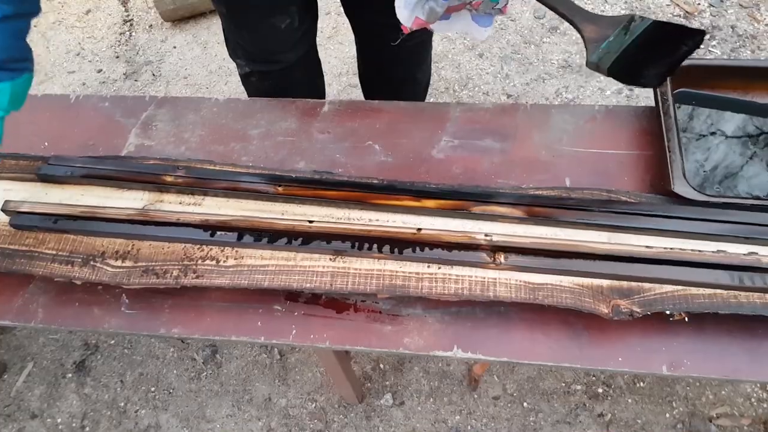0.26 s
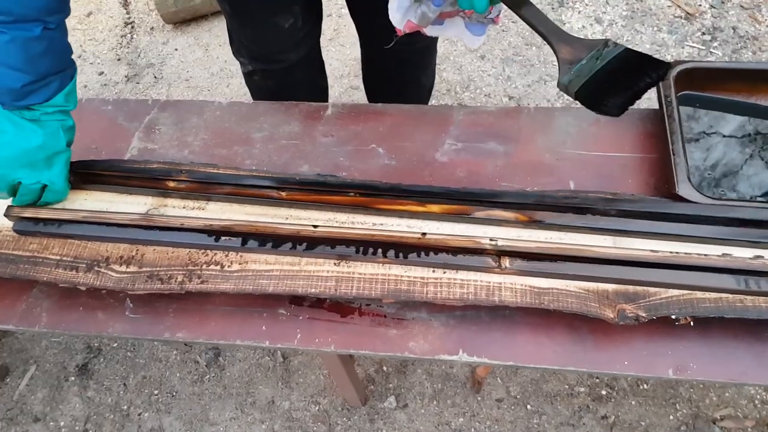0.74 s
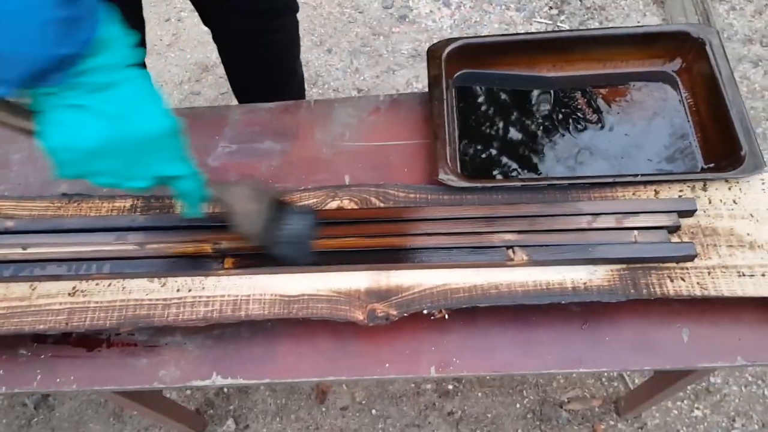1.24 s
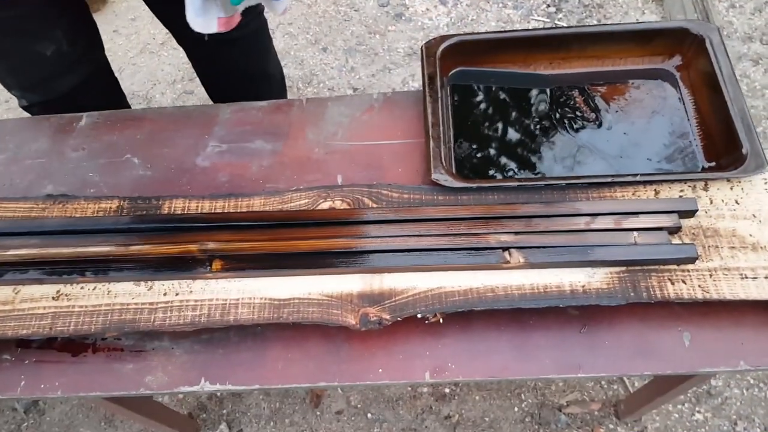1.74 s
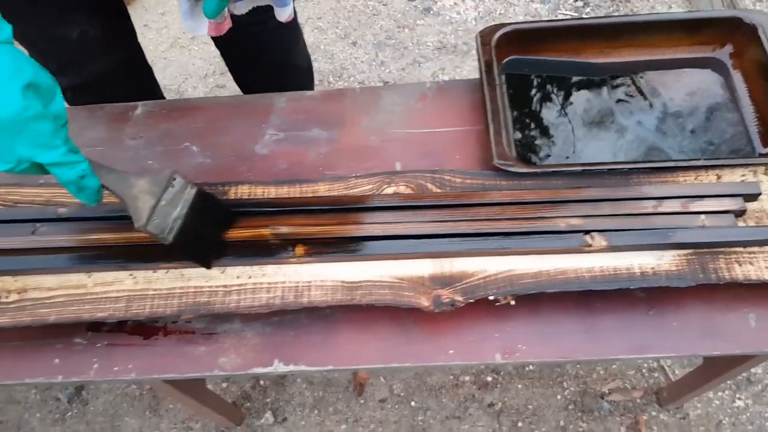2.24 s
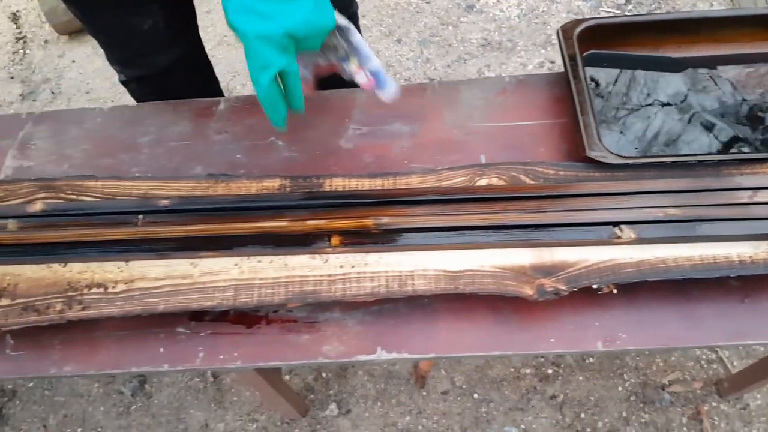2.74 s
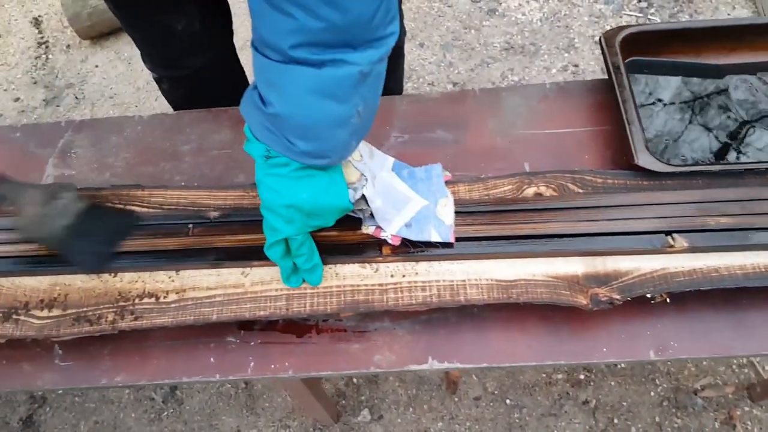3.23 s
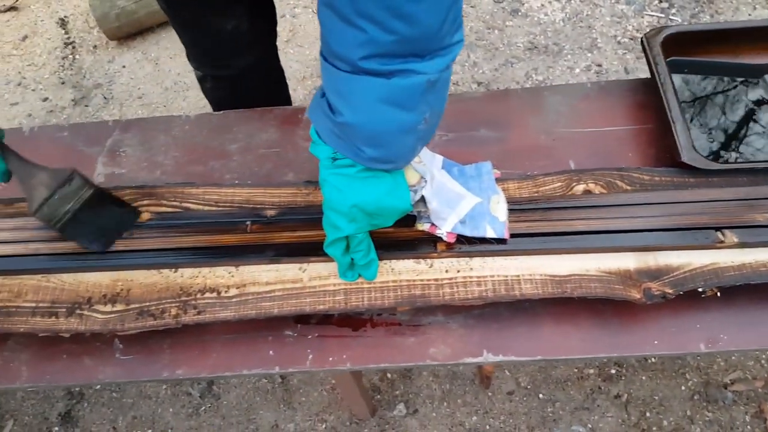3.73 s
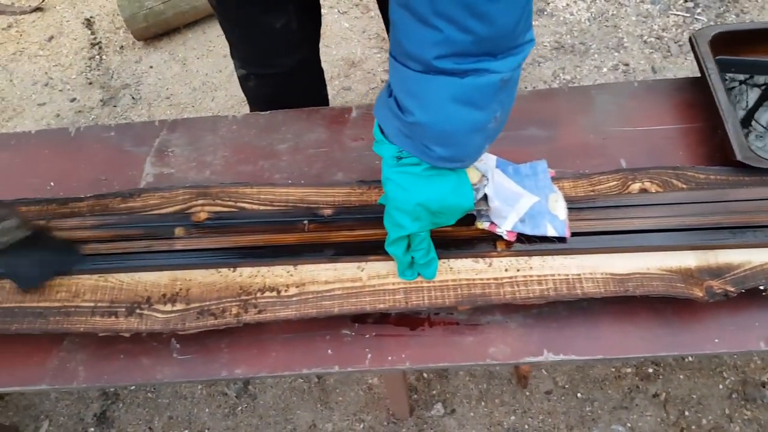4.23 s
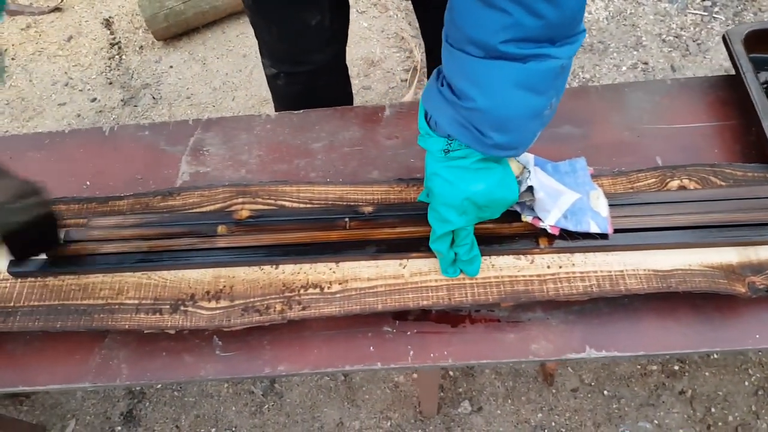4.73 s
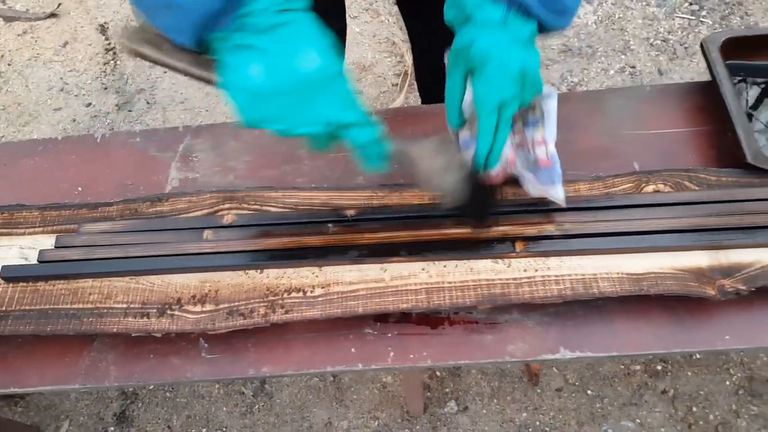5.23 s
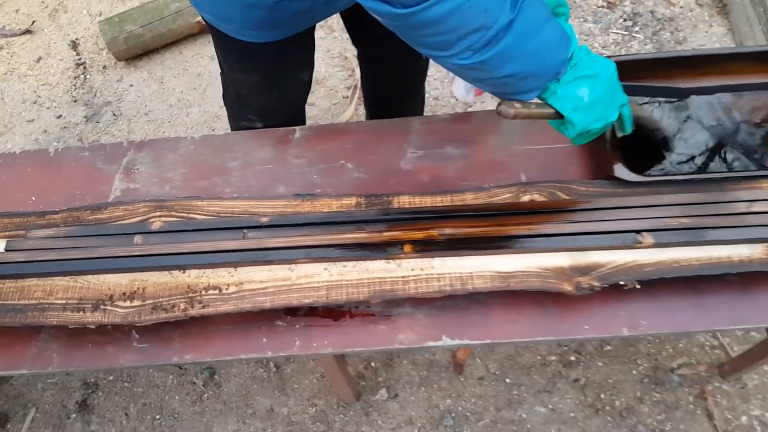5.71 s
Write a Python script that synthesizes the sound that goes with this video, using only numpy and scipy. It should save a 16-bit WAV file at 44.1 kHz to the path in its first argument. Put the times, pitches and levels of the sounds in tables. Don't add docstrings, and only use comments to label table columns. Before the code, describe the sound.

A wet brush rasps and sizzles over wooden slats outdoors in irregular strokes, with one sharp ringing knock and wind buffeting the microphone.

```python
import sys
import numpy as np
from scipy import signal
from scipy.fft import rfft, irfft, next_fast_len
from scipy.io import wavfile
from scipy.ndimage import uniform_filter1d

SR = 44100
rng = np.random.default_rng(int(sys.argv[2]) if len(sys.argv) > 2 else 0)


def volts_from_db(level):
    exponent = np.asarray(level, float) / 20
    return 10 ** exponent


def materialize(psi):
    bounded = np.clip(np.atleast_2d(psi).T, -1, 1)
    quanta = np.round(bounded * 32767).astype(np.int16)
    wavfile.write(sys.argv[1], SR, quanta)


N = 263096
SIZE = next_fast_len(N)
HZ = np.maximum(np.fft.rfftfreq(SIZE, 1 / SR), 1)
STEP = 44
TICKS = np.arange(0, N + STEP, STEP) / SR

# [f/Hz, level per Hz/dB]
AIR_COLOUR = [(180, -21), (300, -3), (432, -4), (461, -2), (501, -11), (621, -9), (674, -23), (783, -26),
              (908, -5), (1470, -32), (6600, -37), (8460, -59), (15600, -9.5)]
AIR_DB = -71.5
HUM_HZ, HUM_WIDTH_HZ, HUM_DB = 71.5, 16, -66.5

WASH_REST_DB, WASH_RE_STROKE_DB, WASH_RE_RUSTLE_DB, WASH_RE_WIND_DB = -76.5, -15.5, 1, -25
WASH_LAG_S = 0.1
WASH_TOP_DB = -66

# [t/s, level/dB]
STEADY_WIND = [(0.0, -54), (0.6, -54.5), (1.17, -47.5), (1.23, -69), (1.85, -77), (2.06, -64), (2.2, -72),
               (2.54, -56), (3.08, -54), (3.6, -52), (4.09, -55), (4.5, -53), (4.72, -49), (5.2, -44.5),
               (5.46, -52), (5.65, -49.5), (5.84, -57.5), (5.97, -51)]
# [peak t/s, swell level/dB, time to lose 10 dB/s, flutter level/dB]
GUSTS = [(0.12, -41, 0.08, -53), (0.29, -38, 0.06, -64), (0.38, -37, 0.03, -60), (0.46, -46, 0.02, -64),
         (0.56, -48.5, 0.02, -71), (0.7, -36, 0.03, -62), (0.9, -40, .11, -55), (1.16, -44.5, 0.06, -69),
         (2.69, -47, .1, -70), (2.76, -35, .012, -59), (2.92, -40, .09, -66), (3.3, -45.5, .14, -63),
         (3.67, -44, 0.08, -63), (3.77, -38, .03, -60), (3.85, -38, .05, -64), (3.99, -40, 0.07, -61),
         (4.22, -36.5, .07, -57), (4.33, -32, 0.0448, -50), (4.63, -47, .06, -65), (4.8, -42.5, 0.02, -59),
         (4.97, -36, .045, -54.5), (5.1, -36.5, .06, -52.5), (5.24, -37.5, .05, -63),
         (5.33, -32.5, 0.0355, -63), (5.43, -39.5, 0.02, -58.5), (5.55, -42, 0.05, -60),
         (5.88, -46, .05, -65)]
GUST_TOP_DB = -31.5
FLUTTER_DB, FLUTTER_FOLLOWS, FLUTTER_LOSS = -66.5, 0.48, 0.75
# [t/s, peak level/dB, push length/s]
BUFFETS = [
    (0.683, -38, 0.006),
    (2.74, -31.5, 0.0077),
    (2.913, -46.5, 0.0096),
    (3.957, -40, 0.0064),
    (4.312, -19, 0.0049),
    (5.037, -32, 0.0058),
    (5.155, -27.5, 0.0087),
    (5.198, -30, 0.0075),
]
MIC_LOW_HZ, PORT_HZ = 27.8, 55.7

BENCH_MODES_HZ = [190, 292, 366, 541, 614, 785, 895, 1035, 1077, 1253, 1303, 1453, 1518, 1772, 1927, 2175,
                  2280, 2522, 2640, 2859]
# [level/dB, time to lose 60 dB/s]
BENCH_RINGING = [(-15, 0.35), (-10.5, 0.18), (-11, 0.28), (-15, 0.23), (-9.5, 0.24), (-7, 0.16), (2, 0.22),
                 (-2.5, 0.2), (-10, 0.24), (-6, 0.37), (-8, 0.66), (-10, .2), (-4, 0.21), (-12, 0.15),
                 (-23, 0.22), (-34, 0.29), (-49, .2), (-21, 0.29), (-52, 0.2), (-43, 0.24)]
BENCH_HIT_S, BENCH_HIT_DB = 0.7995, -29

# [t/s, length/s, level/dB, pitch f/Hz, width/octaves]
SLIDES = [(0.075, 0.057, -59.5, 740, 1.9), (0.655, 0.26, -63.5, 4800, 0.25),
          (0.933, 0.042, -55.5, 1750, 0.36), (2.572, 0.16, -56.5, 222, 0.55), (2.578, .12, -58, 800, 0.46),
          (3.104, 0.03, -60, 1060, 1.24), (1.329, 0.007, -51.5, 6500, 1.6), (4.64, 0.22, -72, 1730, .25),
          (4.422, 0.015, -64.5, 2300, 2.4), (4.93, 0.059, -66, 4000, 0.39),
          (5.015, 0.085, -68.5, 4200, 0.5), (0.1, 0.096, -47.5, 178.6, 0.3), (0.79, 0.093, -50, 206, 0.7),
          (3.254, 0.013, -58.5, 1160, .5)]
# [t/s, peak level/dB, pitch f/Hz, length/s]
FLICKS = [(0.063, -42, 4220, 0.0055), (0.09, -36, 5150, 0.0037), (0.107, -44, 4270, 0.006),
          (0.123, -44, 4090, 0.006), (0.796, -42, 3600, 0.008), (0.9403, -52, 4440, 0.0049),
          (0.9644, -38.5, 4330, 0.0066), (1.6382, -29, 4800, 0.0085), (3.1058, -48, 4250, 0.024),
          (3.7199, -37, 4620, 0.011), (3.9564, -36, 2300, 0.0055), (4.1624, -54, 5260, 0.006),
          (4.167, -56, 6700, 0.006), (4.426, -48, 4700, 0.0052), (4.5306, -48, 7500, 0.012),
          (4.9911, -40, 4600, 0.006), (5.008, -37, 3950, 0.0058)]
# [t/s, peak level/dB, pitch f/Hz, time to lose 60 dB/s, dull body re peak/dB]
KNOCKS = [
    (0.092, -34, 803, 0.027, -18),
    (0.099, -29.5, 857, 0.023, -6),
    (0.799, -16.5, 704, 0.044, -20),
    (0.964, -38.5, 705, 0.025, -19),
    (5.01, -43.5, 806, 0.025, 0),
    (5.536, -43, 850, 0.024, -8),
]

# [t/s, length/s, hiss level/dB, rasp re hiss/dB, sizzle re hiss/dB]
RUSTLES = [(0.0, .03, -68, 6.5, -5), (0.068, 0.058, -64, 0.5, -4), (0.216, 0.48, -82.5, 1.5, 1.5),
           (0.4, 0.036, -77, -3, -1.5), (0.692, .1, -68, -14, -10), (0.792, .016, -57.5, 0, -17),
           (0.83, .065, -71, 0, -10), (0.941, 0.027, -62.5, 1, -4), (1.72, 0.12, -80, 13.5, -5),
           (2.26, 0.11, -76, 12.5, -1), (2.73, 0.35, -69.5, -3.5, -4), (3.112, 0.032, -65, -1, -5.5),
           (3.996, 0.037, -83, 4, 3), (4.15, .03, -81, -8, -4), (4.422, .03, -80, -5, -4),
           (4.97, 0.087, -70.5, 0, -2), (5.17, .37, -71.5, -0.5, -4), (5.06, .1, -75.5, -1, -1.5),
           (5.55, 0.063, -75, 2, -6), (5.63, .1, -81, 1.5, -1.5)]
RUSTLE_IN_DB_PER_S, RUSTLE_OUT_DB_PER_S = 500, 277
RUSTLE_RING_DB = -9.5

# [touch t/s, length/s, hiss at touch/dB, hiss at lift/dB, time to lose 20 dB after the lift/s]
GLIDING_STROKES = [
    (1.013, 0.64, -64.5, -54, .11),
    (1.885, 0.33, -56, -60.5, 0.13),
    (2.386, 0.32, -58, -57, 0.06),
    (3.191, 0.24, -60, -55, 0.0551),
    (4.8, 0.12, -68.5, -56.5, .07),
]
DROPPED_STROKES = [
    (3.715, 0.23, -65.5, -56, .045),
    (4.207, 0.118, -67.5, -56, 0.088),
    (4.535, 0.1, -70.5, -59, .07),
]
GLIDE_ON_DB_PER_S, DROP_ON_DB_PER_S = 320, 1500
EASE, ARCH_DB = 1.56, 2.5
# [t/s, gain/dB, width/s, further gain of the rasp/dB, further gain of the slat ring/dB]
PRESSES = [(1.3, -2.5, 0.16, 3.5, 0.5), (1.56, 1.5, 0.065, 0.8, -0.3), (2.0, 0.7, .07, -1.5, 0.8),
           (2.45, 0.5, .06, 1.5, 2.5), (2.61, 4, .05, 0.5, 3.0), (3.33, 1.5, 0.054, -1.5, 0.5),
           (4.27, 2.5, .03, -0.5, 1.5), (3.8, 1, 0.058, 2, -2.5), (3.93, -0.5, 0.05, 3.0, 0.5),
           (4.62, 0.5, .05, 1.5, -1.5), (4.86, 1.5, .04, -0.5, -2.5)]

# [f/Hz, level per Hz/dB]
BRISTLE_COLOUR = [(240, -70), (400, -22), (624, -15), (944, -8), (1360, -1.8), (1540, 0.4), (2370, 0.8),
                  (2930, -3.5), (3220, -3), (3930, -3.5), (6820, 6), (8710, -6), (11500, -1), (15600, -2)]
# [f/Hz, width/Hz, level/dB]
SLAT_RESONANCES = [(967, 71, 13), (1940, 480, 4), (2396, 310, 1), (3220, 57, 4.5), (3680, 91, 3.5),
                   (4186, 120, 4), (4650, 360, 0.5), (5120, 390, -1.5), (6560, 177, -15)]
RING_TOUCH_DB, RING_LIFT_DB = -4, 1.0
SIZZLE_DB, PEEL_DB = 1.75, 1.5
RASP_DB, RASP_TOP_DB = -4, -58
AWAY_DB_PER_S = 0.8
DULLING_DB_PER_S, DULLING_FROM_S = 0.65, 2.4
# [slat ring/dB, hiss/dB, sizzle/dB, rasp/dB]
REST_LEVELS = (-88.5, -86.5, -82.5, -81.5)


def rms_one(x):
    return x / np.sqrt(np.mean(x ** 2) + 1e-20)


def colour(points):
    hz, level_db = np.transpose(points)
    return volts_from_db(np.interp(np.log(HZ), np.log(hz), level_db))


def drift(rate):
    r = np.exp(-80 * np.pi * rate / SR)
    noise = rng.standard_normal(N // 40 + 2002)
    slow = rms_one(signal.lfilter([1], [1, -2 * r, r * r], noise)[2000:])
    return np.interp(np.arange(N) / 40, np.arange(len(slow)), slow)


def band(x, low_hz, high_hz, order=2):
    edges = [low_hz, min(high_hz, 0.45 * SR)]
    return signal.sosfilt(signal.butter(order, edges, "band", fs=SR, output="sos"), x)


def ring(clicks, hz, t60):
    r = volts_from_db(-60 / (t60 * SR))
    w = 2 * np.pi * hz / SR
    return signal.lfilter([0, np.sin(w)], [1, -2 * r * np.cos(w), r * r], clicks + 1e-18)


def add(out, s, sound):
    i = round(s * SR)
    out[i:i + len(sound)] += sound[:N - i]


def mix_db(*levels_db):
    return 10 * np.log10(sum(volts_from_db(2 * level) for level in levels_db))


def per_sample(*levels):
    return [np.interp(np.arange(N) / SR, TICKS, level) for level in levels]


def strokes():
    s, length, touch_db, lift_db, fade = np.transpose(GLIDING_STROKES + DROPPED_STROKES)[:, :, None]
    counts = [len(GLIDING_STROKES), len(DROPPED_STROKES)]
    land = np.repeat([GLIDE_ON_DB_PER_S, DROP_ON_DB_PER_S], counts)[:, None]
    x = np.clip((TICKS - s) / length, 0, 1)
    sweep = touch_db + (lift_db - touch_db) * (1 - (1 - x) ** EASE) + ARCH_DB * np.sin(np.pi * x)
    sweep = sweep - land * np.maximum(s - TICKS, 0)
    sweep = sweep - 20 / fade * np.maximum(TICKS - s - length, 0)
    along = x[sweep.argmax(axis=0), np.arange(len(TICKS))]

    at, gain_db, width, rasp_db, ring_db = np.transpose(PRESSES)[:, :, None]
    press = np.exp(-((TICKS - at) / width) ** 2)
    hiss = sweep.max(axis=0) + (gain_db * press).sum(axis=0)
    return hiss, along, (rasp_db * press).sum(axis=0), (ring_db * press).sum(axis=0)


def rustles():
    s, length, hiss_db, rasp_db, sizzle_db = np.transpose(RUSTLES)[:, :, None]
    level = hiss_db - RUSTLE_IN_DB_PER_S * np.maximum(s - TICKS, 0)
    level = level - RUSTLE_OUT_DB_PER_S * np.maximum(TICKS - s - length, 0)
    return level.max(axis=0), (level + rasp_db).max(axis=0), (level + sizzle_db).max(axis=0)


def wash_db():
    from_strokes = strokes()[0] + WASH_RE_STROKE_DB
    from_rustles = np.minimum(rustles()[0] + WASH_RE_RUSTLE_DB, WASH_TOP_DB)
    from_wind = np.interp(TICKS, *np.transpose(STEADY_WIND)) + WASH_RE_WIND_DB
    level = mix_db(WASH_REST_DB, from_strokes, from_rustles, from_wind)
    return per_sample(uniform_filter1d(level, round(WASH_LAG_S * SR / STEP) + 1))[0]


def surroundings():
    air = irfft(rfft(rng.standard_normal(SIZE)) * colour(AIR_COLOUR), SIZE)[:N]
    air = volts_from_db(AIR_DB + 2.03 * drift(2.6)) * rms_one(air)
    hum = band(rng.standard_normal(N), HUM_HZ - HUM_WIDTH_HZ / 2, HUM_HZ + HUM_WIDTH_HZ / 2)
    wash = rms_one(band(rng.standard_normal(N), 318, 1010))
    return volts_from_db(wash_db() + 1.25 * drift(14.0)) * wash + air + volts_from_db(HUM_DB) * rms_one(hum)


def gusts():
    steady = np.interp(TICKS, *np.transpose(STEADY_WIND))
    s, swell_db, width, flutter_db = np.transpose(GUSTS)[:, :, None]
    loss = 10 / width * abs(TICKS - s)
    swell = np.maximum(steady, (swell_db - loss).max(axis=0))
    flutter = FLUTTER_DB + FLUTTER_FOLLOWS * (steady + 55)
    flutter = np.maximum(flutter, (flutter_db - FLUTTER_LOSS * loss).max(axis=0))
    return per_sample(swell, flutter)


def wind(lumpy_db=0.5):
    gust_db, flutter_db = gusts()
    swell = band(rng.standard_normal(N), 42.1, 84.9, order=3) * volts_from_db(lumpy_db * drift(15.4))
    swell = swell / uniform_filter1d(swell ** 2 + 1e-12, size=3000) ** 0.32
    flutter = band(np.cumsum(rng.standard_normal(N)), 111, 267) * volts_from_db(1.6 * drift(16.0))
    out = volts_from_db(np.minimum(gust_db, GUST_TOP_DB) - 0.17) * rms_one(swell)
    out += volts_from_db(flutter_db - 1.1) * rms_one(flutter)

    port = signal.butter(4, PORT_HZ, "high", fs=SR, output="sos")
    for s, peak_db, length in BUFFETS:
        push = np.r_[np.hanning(round(length * SR)), np.zeros(SR // 5)]
        thump = signal.sosfilt(port, push)
        add(out, s + 0.0036, volts_from_db(peak_db - 0.8) * thump / abs(thump).max())
    return out


def bench():
    out, t = np.zeros(N), np.arange(SR) / SR
    for hz, (level_db, t60) in zip(BENCH_MODES_HZ, BENCH_RINGING):
        tone = np.sin(2 * np.pi * (hz * t + rng.random()))
        swelling = 1 - np.exp(-t / 0.0038)
        add(out, BENCH_HIT_S, volts_from_db(BENCH_HIT_DB + level_db - 60 * t / t60) * swelling * tone)
    rattle = band(rng.standard_normal(SR), 320, 1530)
    add(out, BENCH_HIT_S, volts_from_db(-29 - 60 * t / 0.29) * rattle)
    return out


def slides():
    out = np.zeros(N)
    for s, length, level_db, hz, octaves in SLIDES:
        x = np.linspace(0, 1, round(length * SR))
        half = 2 ** (octaves / 2)
        rough = rng.standard_normal(SR // 2) * volts_from_db(2.0 * drift(40)[:SR // 2])
        noise = rms_one(band(rough, hz / half, hz * half))[:len(x)]
        add(out, s, volts_from_db(level_db) * noise * np.sin(np.pi * x ** 1.33) ** 0.4)
    return out


def knocks():
    out, t = np.zeros(N), np.arange(9000) / SR
    for s, peak_db, hz, t60, body_db in KNOCKS:
        blow = np.r_[np.hanning(20) / 10, np.zeros(len(t) - 20)]
        blow = 0.72 * blow + 0.48 * np.roll(blow, round(SR / hz))
        note = ring(blow, hz, t60) + 0.21 * ring(blow, hz * 1.15, t60) + 0.11 * ring(blow, hz * 0.67, t60)
        add(out, s, volts_from_db(peak_db - 2.0) * note)
        body = rms_one(band(np.cumsum(rng.standard_normal(len(t))), 117, 440))
        body_fade = volts_from_db(peak_db + body_db - 3.5 - 60 * t / 0.21)
        add(out, s, body_fade * np.minimum(t / 0.0037, 1) * body)
    return out


def flicks():
    out, t = np.zeros(N), np.arange(2000) / SR
    for s, peak_db, hz, length in FLICKS:
        puff = rng.standard_normal(len(t))
        tone = rms_one(band(puff, hz * 0.88, hz * 1.21)) + 0.59 * band(puff, 1400, 21000)
        add(out, s, volts_from_db(peak_db - 14) * tone * np.minimum(t / 0.0016, 1) * np.exp(-t / length))
    return out


def rubbing():
    stroke, along, bite, wake = strokes()
    rustle, rustle_rasp, rustle_sizzle = rustles()
    slats = stroke - AWAY_DB_PER_S * TICKS
    ringing = slats + wake + RING_TOUCH_DB + (RING_LIFT_DB - RING_TOUCH_DB) * along
    sizzle = stroke + SIZZLE_DB + PEEL_DB * along
    rasp = slats + RASP_DB + bite
    from_brush = (ringing, stroke, sizzle, rasp)
    from_hands = (rustle + RUSTLE_RING_DB, rustle, rustle_sizzle, rustle_rasp)
    return per_sample(*(mix_db(*layer) for layer in zip(from_brush, from_hands, REST_LEVELS)))


def brush(slips_per_s=6000, spread_db=1.0, patchy_db=1.6, chatter_db=0.62, travel_db=2.2):
    ring_db, hiss_db, sizzle_db, rasp_db = rubbing()
    slips = (rng.random(N) < slips_per_s / SR) * volts_from_db(spread_db * np.minimum(rng.exponential(1, N), 5))
    friction = rms_one(slips * rng.standard_normal(N)) + 1.76 * rng.standard_normal(N)
    friction = friction * volts_from_db(chatter_db * drift(50))

    pressed_db = 0.56 * np.minimum(hiss_db + 46.5, 0)
    slat = friction.copy()
    for hz, width, top_db in SLAT_RESONANCES:
        gain = volts_from_db(top_db + pressed_db + travel_db * drift(6.3))
        slat += gain * band(friction, hz - width / 2, hz + width / 2, order=1)

    spectrum = rfft(slat, SIZE) * colour(BRISTLE_COLOUR)
    place = 3 * np.log2(HZ / 400)
    parts = [0, 0, 0]
    for k in range(3, 17):
        part = irfft(spectrum * np.clip(1 - abs(place - k), 0, 1), SIZE)[:N]
        parts.append(part * volts_from_db(patchy_db * drift(7.4)))
    wetter_db = DULLING_DB_PER_S * (np.arange(N) / SR - DULLING_FROM_S)
    for k, lean in zip(range(3, 9), (1.5, 1.5, 1.5, 0.5, -0.5, -1.5)):
        parts[k] = parts[k] * volts_from_db(wetter_db * lean)

    rasp = volts_from_db(np.minimum(rasp_db, RASP_TOP_DB)) * rms_one(sum(parts[3:9]))
    ringing = volts_from_db(ring_db) * rms_one(sum(parts[9:11]))
    hiss = volts_from_db(hiss_db) * rms_one(sum(parts[11:14]))
    sizzle = volts_from_db(sizzle_db) * rms_one(sum(parts[14:17]))
    return ringing + hiss + sizzle + rasp


def scene():
    return (surroundings() + wind() + bench() + slides() + knocks() + flicks() + brush())[None]


def roll_off(x):
    return signal.sosfilt(signal.butter(12, 15870, fs=SR, output="sos"), x)


def record(dry):
    x = signal.sosfilt(signal.butter(2, MIC_LOW_HZ, "high", fs=SR, output="sos"), dry)
    x = irfft(rfft(x, SIZE) * (HZ < 15740), SIZE)[:, :N]
    return roll_off(x)


dry = scene()
out = record(dry)
materialize(out)
```